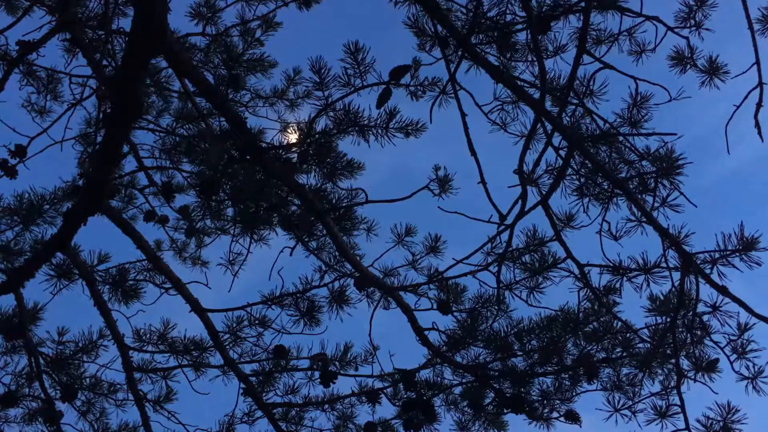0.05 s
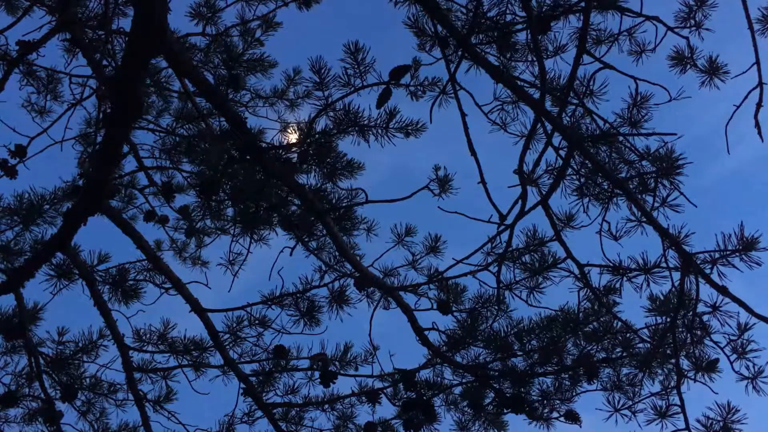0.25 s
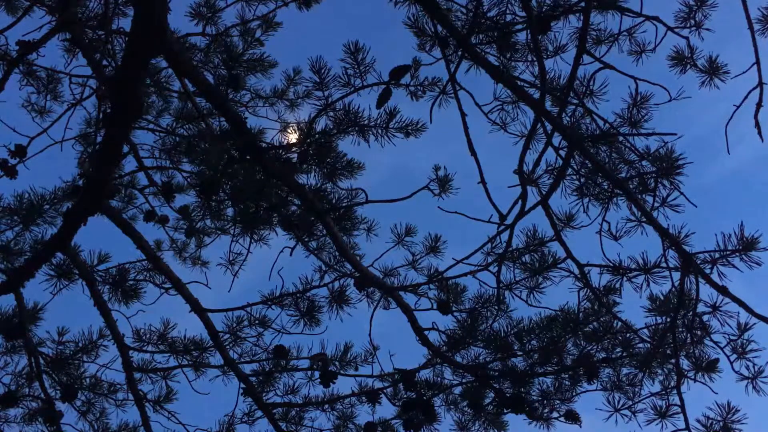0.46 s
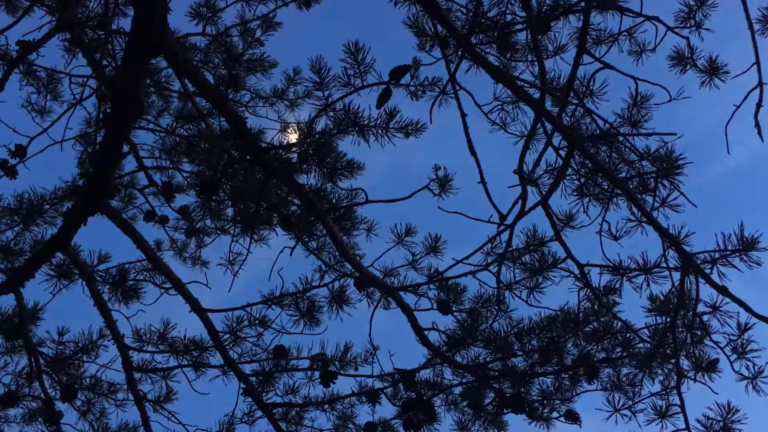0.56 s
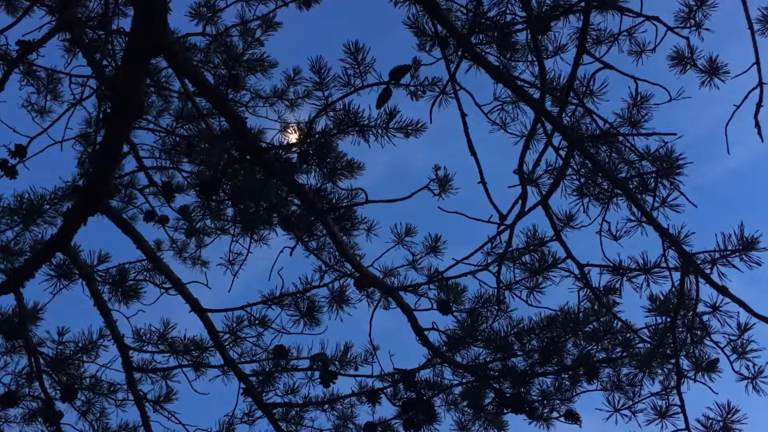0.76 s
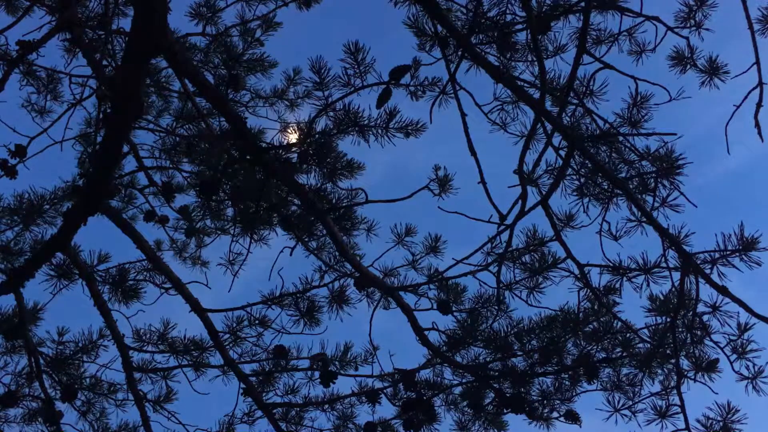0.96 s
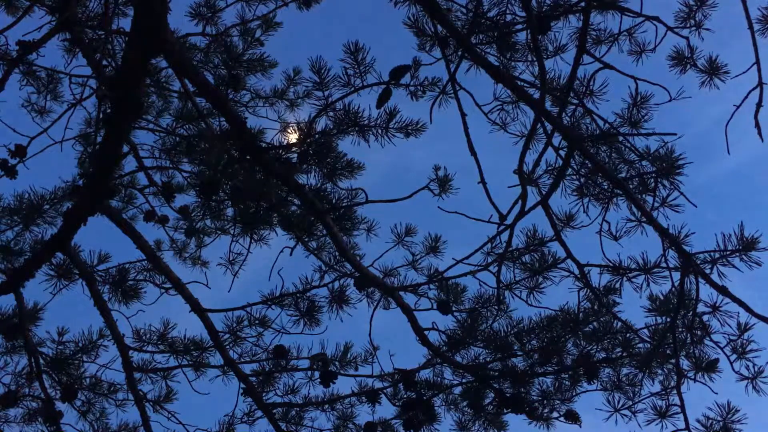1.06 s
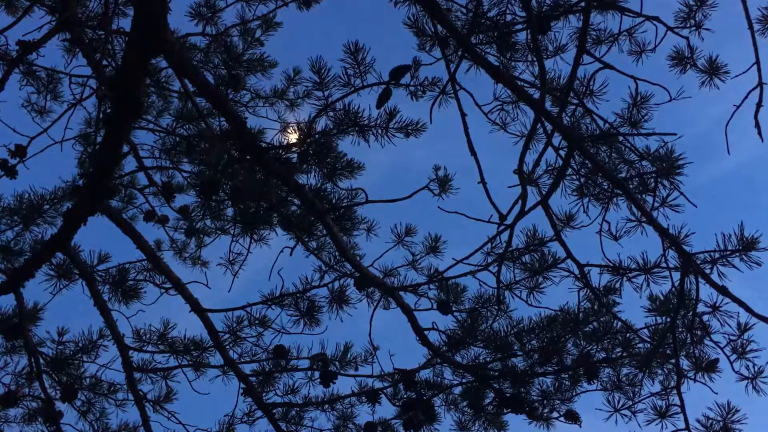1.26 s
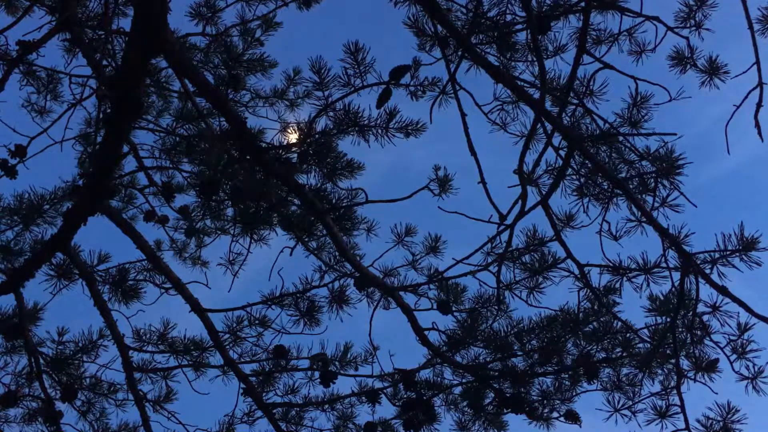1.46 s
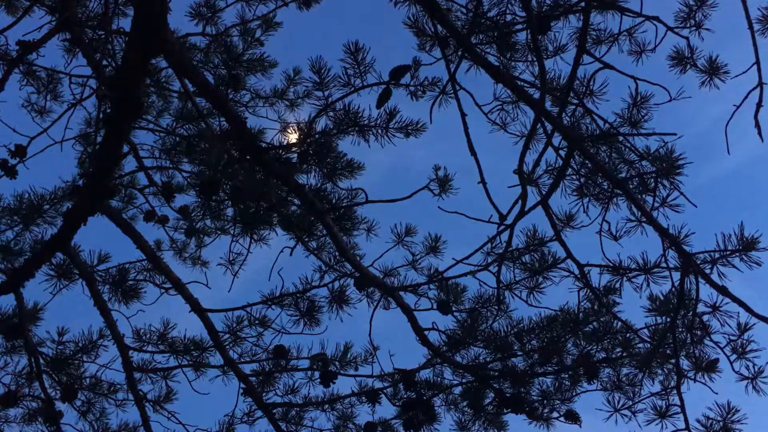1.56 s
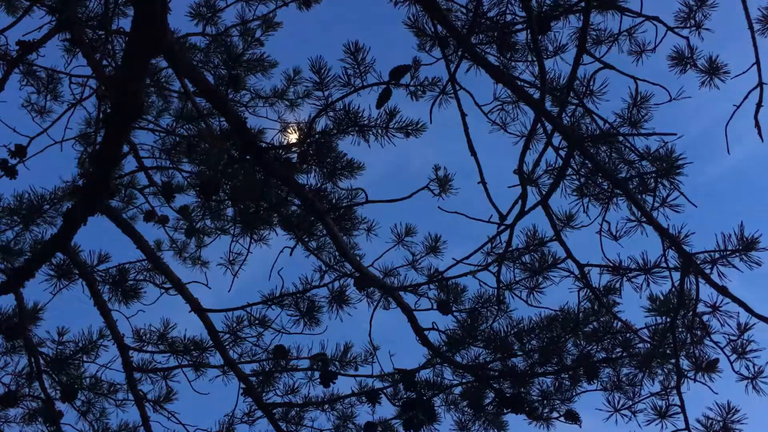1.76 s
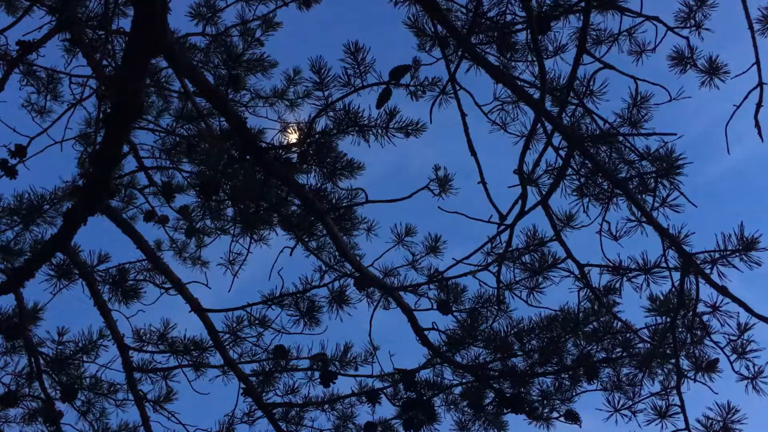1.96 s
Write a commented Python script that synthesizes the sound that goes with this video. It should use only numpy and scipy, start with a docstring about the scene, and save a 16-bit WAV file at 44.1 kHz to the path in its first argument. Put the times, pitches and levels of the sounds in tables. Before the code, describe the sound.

A nearby whip-poor-will repeats its clear whistled call: soft cluck, short rising whip, quieter trilled poor, loud sweeping will. Trees echo each note; faint far bird calls, low hum and soft hiss lie behind.

```python
"""A whip-poor-will sings near the microphone in woodland at dusk: a soft cluck, "whip", a trilled "poor"
and a loud swept "will", each a gliding sine; the three song notes carry weak overtones.
Trunks and crowns, built as random echoes, scatter each whistle into a long tail.
Far off, another bird chirps and a faint hoot sounds, mostly as echo.
Behind them lie a low distant hum of wavering sines, and still air and hiss of shaped noise."""
import sys
import numpy as np
from scipy import signal
from scipy.fft import rfft, irfft
from scipy.io import wavfile
from scipy.ndimage import uniform_filter1d

SR = 44100
rng = np.random.default_rng(int(sys.argv[2]) if len(sys.argv) > 2 else 0)


def transcribe(signal):
    """Save signal, clipped to [-1, 1], as a 16-bit WAV file at the path in sys.argv[1]."""
    frames = np.atleast_2d(signal).T
    limited = np.clip(frames, -1, 1)
    pcm = np.round(limited * 32767).astype(np.int16)
    wavfile.write(sys.argv[1], SR, pcm)


N = 88200

# Near bird, contour of each note: t/s from its start, f/Hz, level/dB before the event level
WHIP_CONTOUR = [(0, 1235, -26), (.009, 1340, -8.5), (.03, 1465, -4.5), (.047, 1630, 0.5), (.066, 1733, 4),
                (.084, 1796, -3), (.112, 1718, 2), (.124, 1705, 6.5), (.142, 1400, -30)]
POOR_CONTOUR = [(0, 1206, -24), (.03, 1236, -20), (.045, 1254, -14.5), (.07, 1297, -7.5), (.1, 1246, -12.5),
                (.114, 1545, -5.5), (.152, 1618, -12), (.17, 1560, -10.5), (.175, 1330, -3.5),
                (.181, 1564, -5.5), (.222, 1576, -7), (.253, 1580, -10.5), (.258, 1362, -3),
                (.264, 1547, -7), (.308, 1605, -6.5)]
WILL_CONTOUR = [(0, 1601, -14.5), (.026, 1709, -3.5), (.045, 1963, -5.5), (.062, 2315, 1.5),
                (.077, 2620, -5.5), (.085, 2755, 1.5), (.095, 2350, -0.5), (.104, 2058, 1.5),
                (.119, 1830, -9), (.134, 1785, -4.5), (.143, 1641, -37)]
CLUCK_CONTOUR = [(0, 1244, 1), (.005, 1090, -3), (.01, 970, -1.5), (.016, 789.6, -19)]
# Near bird, when each note starts: t/s, level/dB added to the contour (before 0 s, only what lasts is heard)
WHIP_EVENTS = [(-.245, -46), (.828, -47.5), (1.98, -45)]
POOR_EVENTS = [(.092, -42.5), (1.16, -43.5)]
WILL_EVENTS = [(.398, -36.5), (1.467, -37)]
CLUCK_EVENTS = [(.757, -56.5), (1.906, -56.5)]
# Overtones of "whip" and "poor", then of the purer "will": multiple of the pitch, level/dB before the throat
HELD_OVERTONES = [(2, -30), (3, -40), (4, -29)]
SWEEP_OVERTONES = [(3, -37.5), (4, -36)]
# What throat and beak let through of the overtones: f/Hz, level/dB
THROAT_RESPONSE = [(2400, -1), (3200, -5), (3800, -8), (4400, -22), (5700, -13), (6250, 0), (6700, -4.5),
                   (7050, -3), (7500, -12), (8100, 0), (8500, -13), (9500, -30)]
# Woodland tail, time to fall by 60 dB: f/Hz, t60/s
TAIL_DECAY = [(800, 0.62), (1200, 0.43), (1400, 1.35), (1750, 0.93), (2500, 0.93), (3500, 1.22),
              (4600, 1.22), (8000, 0.68)]
# Far calls, contours: t/s from the start, f/Hz, level/dB before the event level
CHIRP_CONTOUR = [(0, 3028, 3), (.012, 4200, 0), (.024, 4680, 0), (.035, 4559, -0.5), (.044, 3576, 1),
                 (.056, 3150, -21), (.066, 5300, -3.5), (.08, 5500, -14)]
HOOT_CONTOUR = [(0, 877.5, 0), (.04, 1041, 3.5), (.07, 1070, -6.5), (.1, 1012, -6)]
# Far calls, when each starts: t/s, level/dB added to the contour, before the direct and echo gains
CHIRP_EVENTS = [(0.907, -65), (1.902, -65)]
HOOT_EVENTS = [(1.335, -70)]
# Distant hum, its tones: f/Hz, rms level/dB
HUM_TONES = [(87, -74), (109.3, -67), (237, -89)]
# Still air and hiss, spectrum shape: f/Hz, relative density level/dB per Hz
AIR_SPECTRUM = [(20, -24), (35, -21), (48, 1.5), (70, -3), (110, -1), (160, -7), (250, -9.5), (450, -15.5),
                (800, -20.5), (2500, -19.5), (3200, -24.5), (4300, -27), (5000, -29), (6500, -27.5),
                (9000, -27.5), (10300, -29), (11300, -25.5), (14000, -22.5), (15700, -23.5)]

# Whistle: random pitch waver (rms share of the pitch, time scale), fade at each end, smoothing of the glide
WAVER_SHARE, WAVER_S, EDGE_S, GLIDE_S = .004, .004, 0.0042, 0.0051
# Flutter in "will": rate, share of the pitch, level swing, its middle and half length in the note
FLUTTER_HZ, FLUTTER_SHARE, FLUTTER_DB, FLUTTER_AT_S, FLUTTER_SPAN_S = 101.1, 0.052, 1, 0.05476, 0.021
# Woods: echo-free gap, decay of the near scatter, energy level of near scatter and of far tail
FIRST_ECHO_S, NEAR_T60_S, NEAR_DB, TAIL_DB = 0.0089, 0.27, -4, -5
ECHOES_PER_S = 2000  # mean rate
CLUCK_WET_DB, FAR_DIRECT_DB, FAR_WET_DB = -2, -5, 2
HUM_WAVER_SHARE, HUM_WAVER_S = 0.078, .15
AIR_DB = -66.5  # rms
EDGE_HZ = 15850


def whip_poor_will():
    """The near bird, direct and echoed by the trees; the cluck carries less far into them."""
    held = sing(WHIP_CONTOUR, WHIP_EVENTS, HELD_OVERTONES) + sing(POOR_CONTOUR, POOR_EVENTS, HELD_OVERTONES)
    song = held + sing(WILL_CONTOUR, WILL_EVENTS, SWEEP_OVERTONES, flutters=True)
    clucks = sing(CLUCK_CONTOUR, CLUCK_EVENTS)
    echoed = woods(song + amp(CLUCK_WET_DB) * clucks)
    return (song + clucks + echoed)[SR:]


def whistle(contour, overtones, flutters):
    """A nearly pure tone follows the note's pitch and level; a fluttering note climbs in quick steps."""
    at, hz, db = np.transpose(contour)
    t = np.arange(0, at[-1], 1 / SR)
    since = t - FLUTTER_AT_S
    flutter_window = np.exp(-(since / FLUTTER_SPAN_S) ** 4)
    flutter = flutters * np.cos(2 * np.pi * FLUTTER_HZ * since) * flutter_window
    glide = smooth(np.interp(t, at, hz), GLIDE_S)
    pitch = glide * (1 + WAVER_SHARE * drift(len(t), WAVER_S) + FLUTTER_SHARE * flutter)
    phase = 2 * np.pi * np.cumsum(pitch) / SR
    tone = np.sin(phase)
    for multiple, over_db in overtones:
        k = round(multiple)
        through_throat = amp(over_db + read(THROAT_RESPONSE, k * pitch))
        tone = tone + through_throat * np.sin(k * phase)
    level = amp(np.interp(t, at, db) + FLUTTER_DB * flutter)
    fades = np.clip(np.minimum(t, t[-1] - t) / EDGE_S, 0, 1)
    return tone * level * fades


def sing(contour, events, overtones=(), flutters=False):
    """Whistles one kind of note at its times, on a track that begins one second early."""
    track = np.zeros(N + SR)
    for start, db in events:
        add(track, start, amp(db) * whistle(contour, overtones, flutters))
    return track


def woods(x):
    """Quick scatter from near trunks, and a tail from trees beyond whose decay depends on frequency."""
    t = np.arange(SR) / SR
    arrives = rng.random((2, SR)) < ECHOES_PER_S / SR
    taps = rng.standard_normal((2, SR)) * arrives * (t > FIRST_ECHO_S)
    near = taps[0] * amp(-60 * t / NEAR_T60_S)
    hz, at, bands = signal.stft(taps[1], SR, nperseg=256)
    decay = amp(-60 * at / read(TAIL_DECAY, hz)[:, None])
    far = signal.istft(bands * decay, SR, nperseg=256)[1][:SR]
    echoes = amp(NEAR_DB) * near / np.linalg.norm(near) + amp(TAIL_DB) * far / np.linalg.norm(far)
    return signal.fftconvolve(x, echoes)[:len(x)]


def far_birds():
    """Faint whistled calls from a distance, which arrive mostly as echo."""
    calls = sing(CHIRP_CONTOUR, CHIRP_EVENTS) + sing(HOOT_CONTOUR, HOOT_EVENTS)
    return (amp(FAR_DIRECT_DB) * calls + amp(FAR_WET_DB) * woods(calls))[SR:]


def hum():
    """Low steady-pitched tones that waver in level, as of a distant machine."""
    t = np.arange(N) / SR
    total = np.zeros(N)
    for hz, db in HUM_TONES:
        tone = np.sin(2 * np.pi * (hz * t + rng.random()))
        waver = 1 + HUM_WAVER_SHARE * drift(N, HUM_WAVER_S)
        total += amp(db) * evened(tone * waver)
    return total


def air():
    """Steady low rumble and hiss: white noise shaped by one spectrum."""
    hz = np.fft.rfftfreq(N, 1 / SR)
    shaped = rfft(rng.standard_normal(N)) * amp(read(AIR_SPECTRUM, hz))
    return amp(AIR_DB) * evened(irfft(shaped))


def amp(db):
    """Decibels to gain."""
    return 10 ** (np.asarray(db) / 20)


def evened(x):
    """Scales to rms 1."""
    return x / np.sqrt(np.mean(x ** 2) + 1e-20)


def read(points, hz):
    """Reads a curve of (f/Hz, value) on a log-frequency axis."""
    f, value = np.transpose(points)
    return np.interp(np.log(hz + 1), np.log(f + 1), value)


def smooth(x, seconds):
    """Moving average."""
    return uniform_filter1d(x, max(1, round(seconds * SR)), mode="nearest")


def drift(size, seconds):
    """Random wander: low-passed noise, cut from a longer stretch of rms 1."""
    hz = np.fft.rfftfreq(2 * N, 1 / SR)
    spectrum = rfft(rng.standard_normal(2 * N)) * np.exp(-(hz * seconds) ** 2)
    return evened(irfft(spectrum))[:size]


def add(track, start, sound):
    """Adds a sound to a track that begins one second early."""
    part = track[round((start + 1) * SR):][:len(sound)]
    part += sound[:len(part)]


def scene():
    """All sources summed at one microphone."""
    return (whip_poor_will() + far_birds() + hum() + air())[None]


def record(dry):
    """The recorder's band limit: a steep low-pass."""
    low_pass = signal.firwin(511, EDGE_HZ, window=("kaiser", 9), fs=SR)
    return signal.oaconvolve(dry, low_pass[None], "same")


dry = scene()
out = record(dry)
transcribe(out)
```